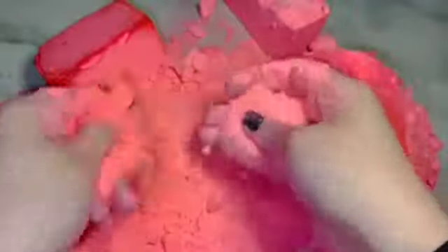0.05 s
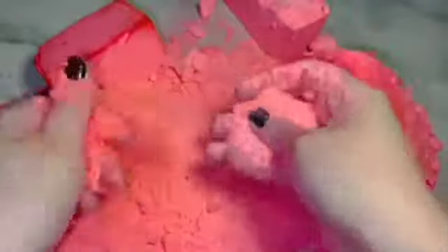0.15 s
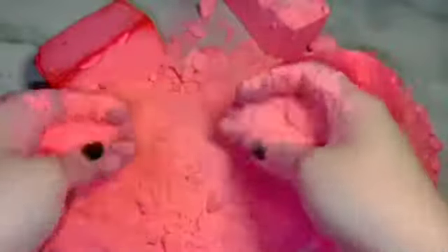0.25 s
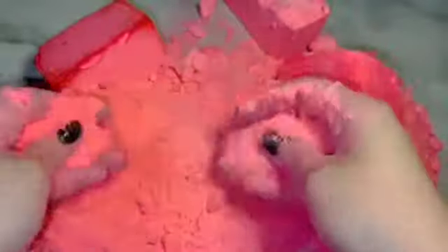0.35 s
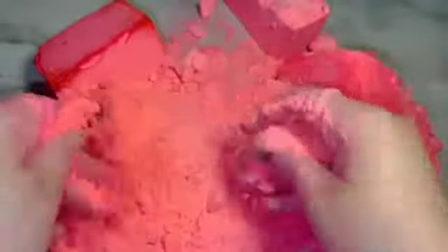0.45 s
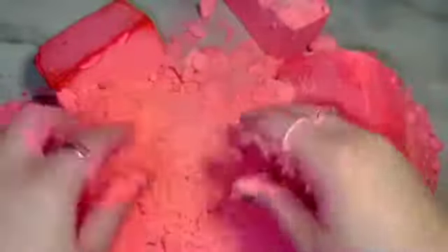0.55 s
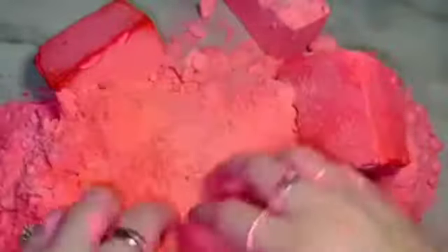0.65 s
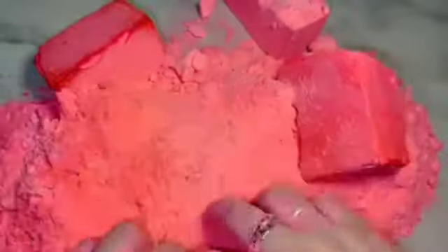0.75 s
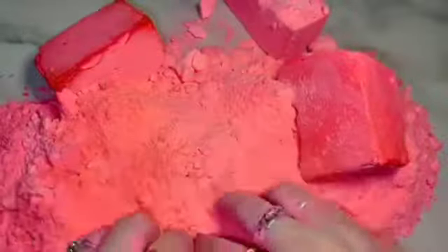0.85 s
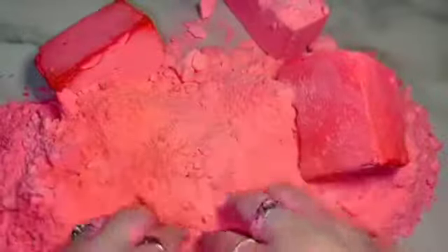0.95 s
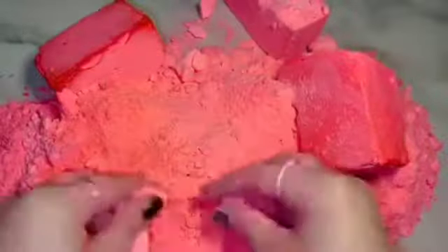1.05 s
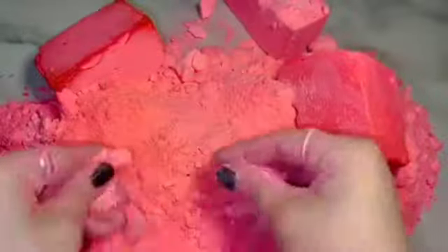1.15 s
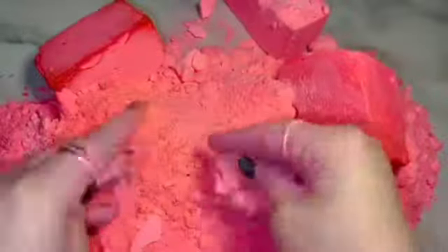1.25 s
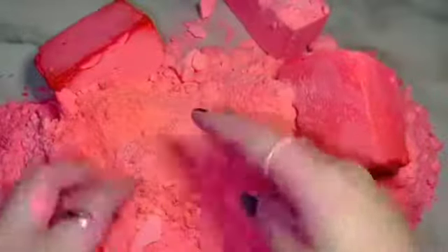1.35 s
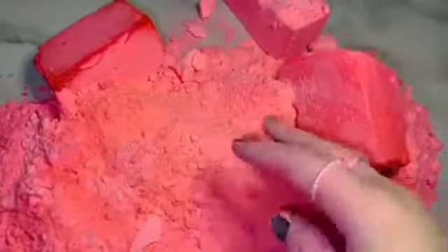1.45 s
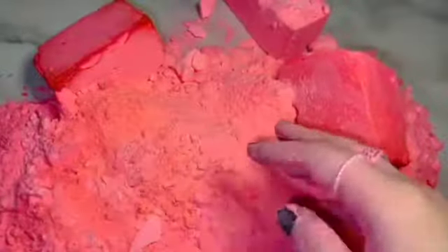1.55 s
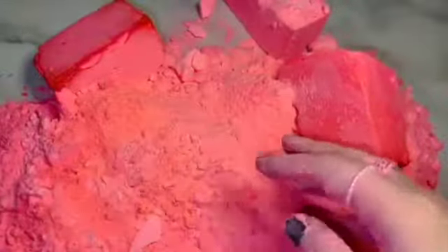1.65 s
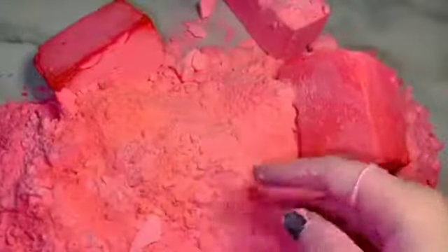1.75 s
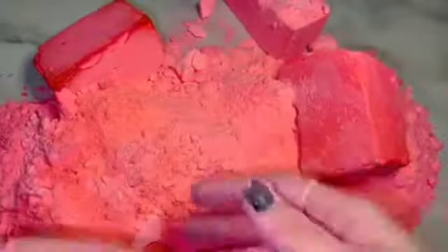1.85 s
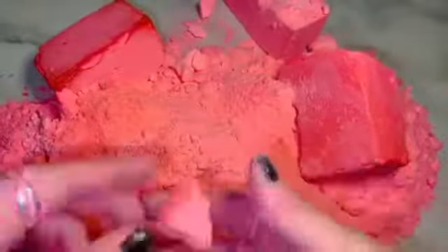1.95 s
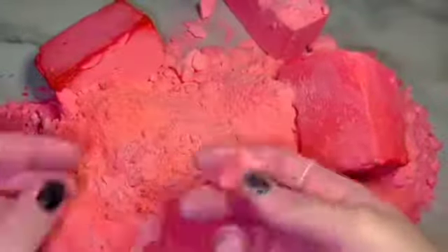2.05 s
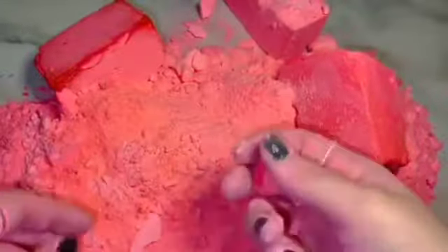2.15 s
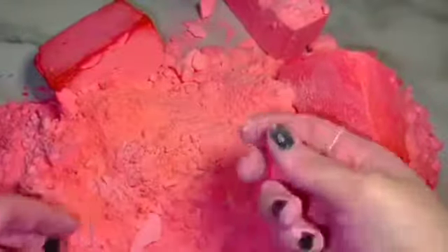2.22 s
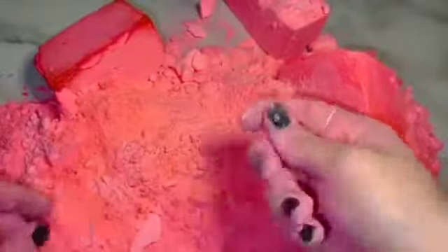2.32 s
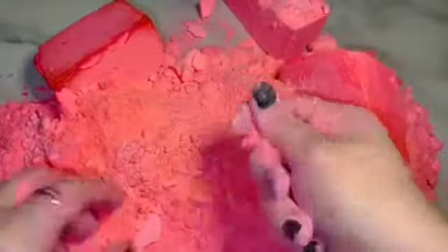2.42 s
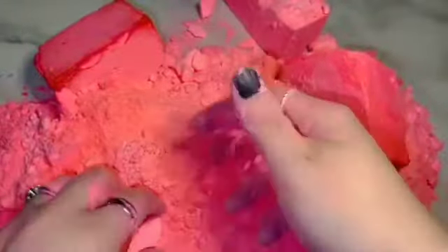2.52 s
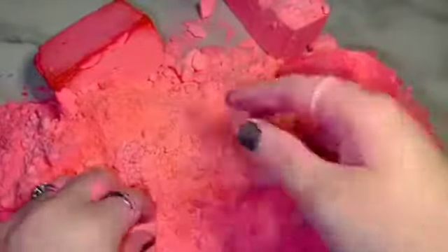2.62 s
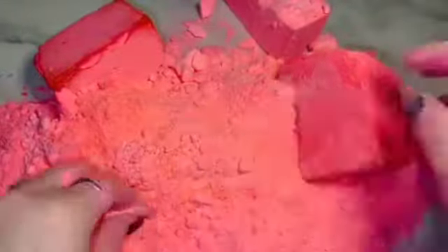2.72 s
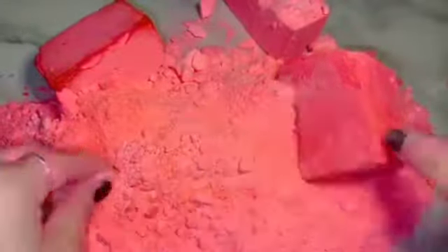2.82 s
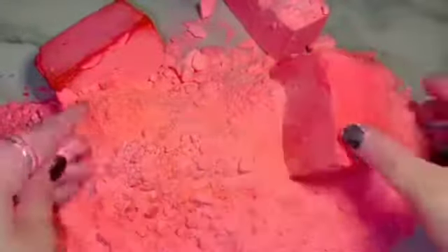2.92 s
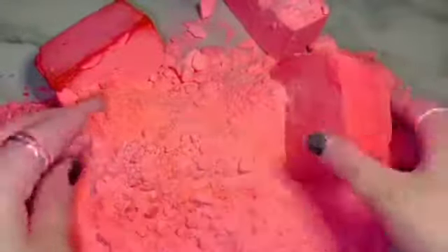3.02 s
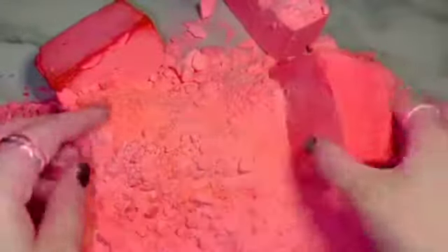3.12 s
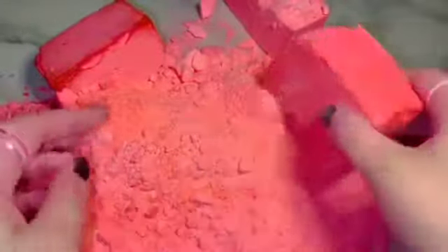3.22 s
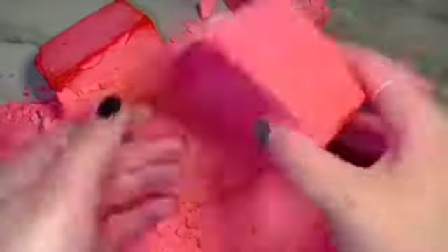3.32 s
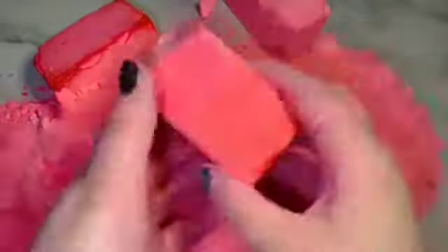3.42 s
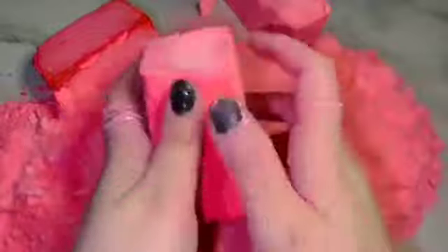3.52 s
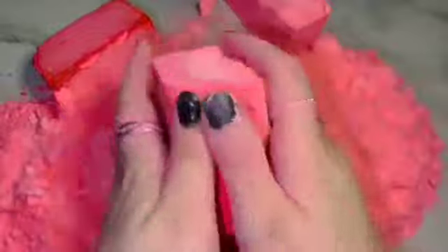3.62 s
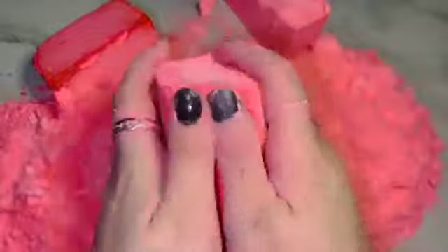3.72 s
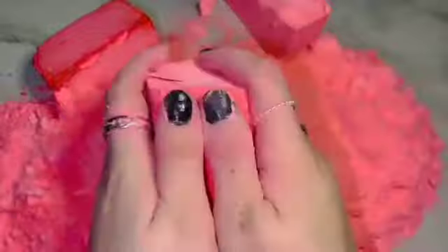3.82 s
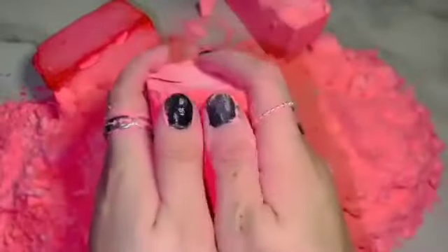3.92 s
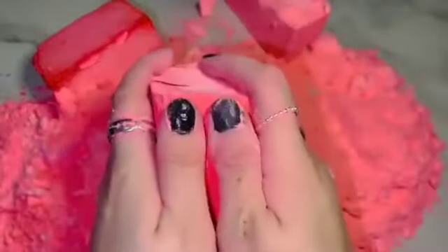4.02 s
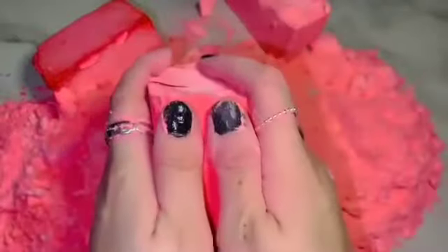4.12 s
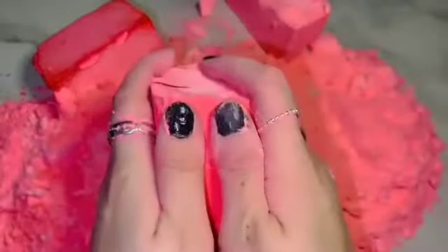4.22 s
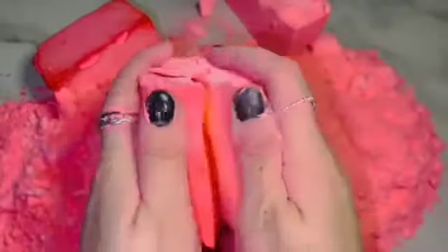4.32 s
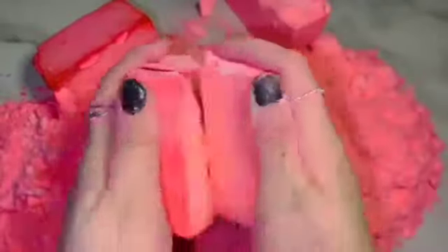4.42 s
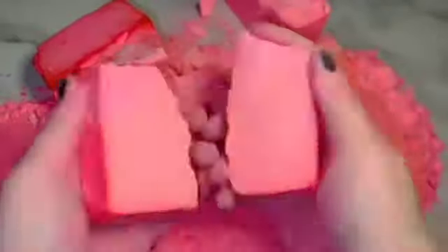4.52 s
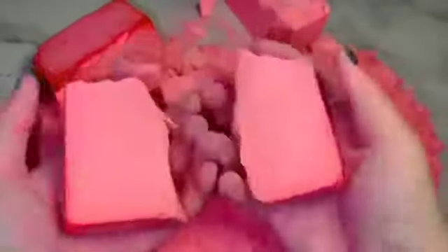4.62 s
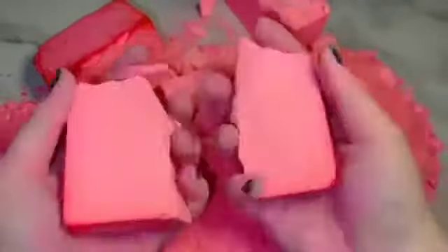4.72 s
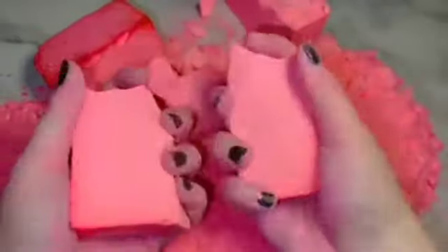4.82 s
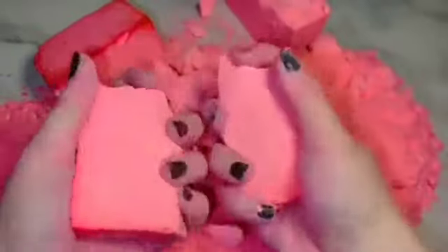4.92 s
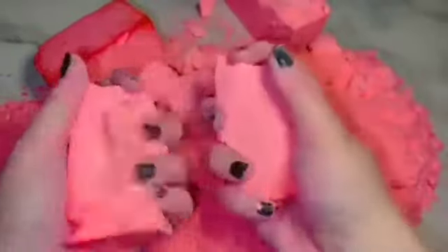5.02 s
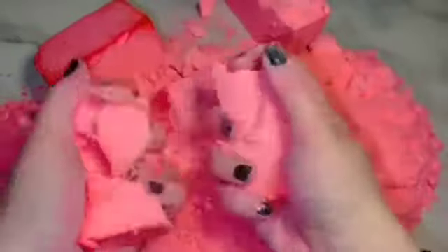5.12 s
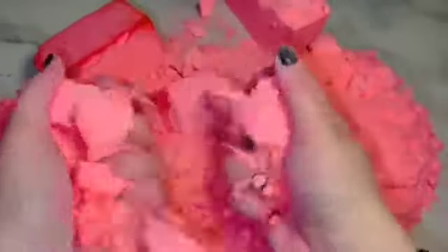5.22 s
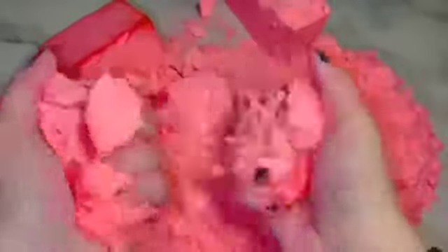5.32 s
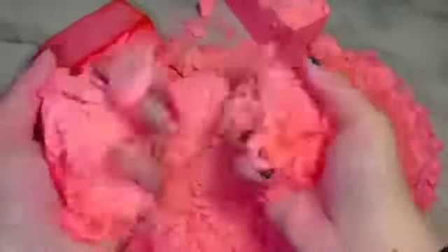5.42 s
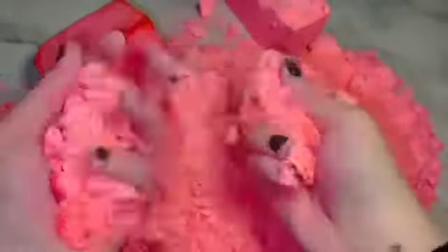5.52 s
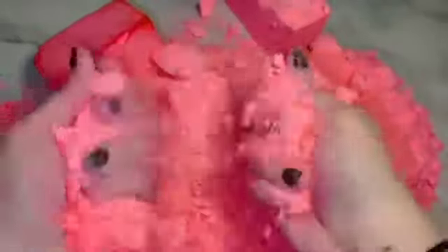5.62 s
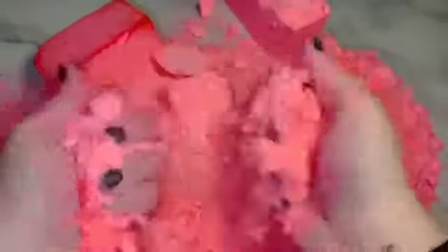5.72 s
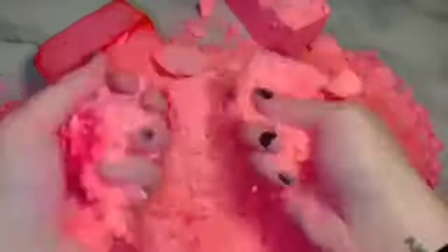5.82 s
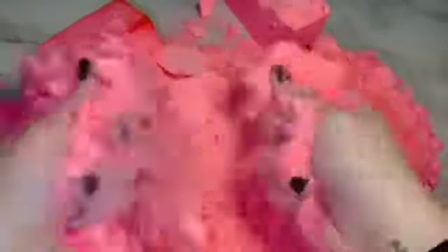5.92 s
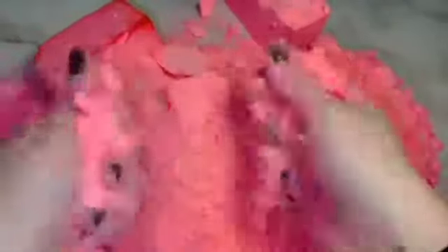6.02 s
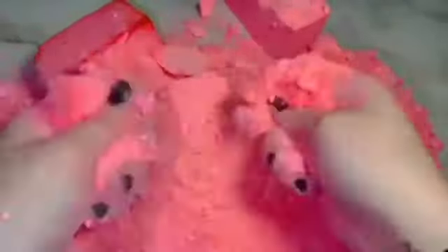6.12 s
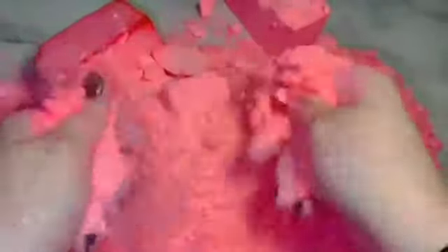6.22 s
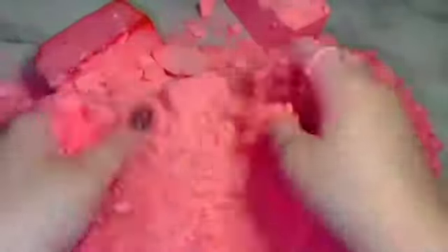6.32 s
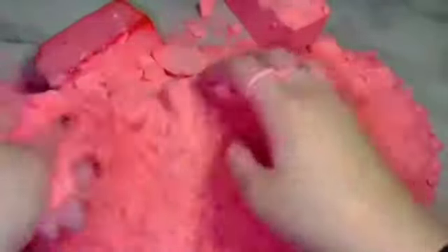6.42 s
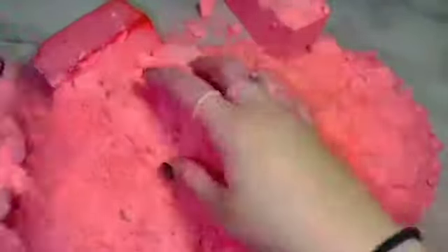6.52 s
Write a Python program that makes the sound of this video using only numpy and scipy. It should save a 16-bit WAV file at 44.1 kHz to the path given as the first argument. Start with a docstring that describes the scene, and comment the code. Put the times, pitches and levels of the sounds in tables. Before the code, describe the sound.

Hands work dry gym chalk over its own powder. Soft swishes and light ticks come first, with a crisp little break midway. A block is picked up and rubbed with brief airy scrapes, then breaks with a hard clean crack. The pieces are crunched much louder, in rapid dry cracks and dull thuds, then crumbs patter and grind away. Very close, bright, nearly echoless sound over a faint low room rumble.

```python
"""Dry gym chalk worked by hand over a bed of its own powder, close to a small microphone in a quiet room.
Strokes are trains of random grain clicks, filtered into powder hiss and crumb crunch; gliding resonances
give fingertip scrapes and the whistle of the rubbed block. Palms rub a fresh block, which is snapped in
two and its halves crushed: each break is a decaying burst of micro-fractures through the piece's
resonance, the larger ones with showers of debris. Thuds sink in pitch; a low room rumble lies beneath."""
import sys
import numpy as np
from scipy import signal
from scipy.fft import rfft, irfft
from scipy.io import wavfile

SR = 44100
rng = np.random.default_rng(int(sys.argv[2]) if len(sys.argv) > 2 else 0)


def pcm_store(signal):
    """Save signal as 16-bit PCM."""
    levels = np.round(np.clip(np.atleast_2d(signal), -1, 1) * 32767)
    wavfile.write(sys.argv[1], SR, levels.astype(np.int16).T)


N = 288855  # length of the scene [samples]

# microphone response with notches and a high port resonance: (frequency [Hz], gain [dB])
MIC_RESPONSE = [(3000, 1), (4300, 3.5), (4900, -4.5), (5600, 4.5), (7000, 2.5), (8150, -2), (8800, -12),
                (9400, -3.5), (9750, 8), (10400, 8), (10950, -0.5), (11600, -6), (12300, -25)]


def amp(db):
    """Level law: a ratio in decibels becomes an amplitude gain."""
    return 10 ** (np.asarray(db) / 20)


def unit(x):
    """Power normalisation: scales a signal to rms 1."""
    return x / np.sqrt(np.mean(x ** 2) + 1e-30)


def shape(points):
    """Spectral envelope: (Hz, dB) points become a gain, interpolated in dB over log frequency."""
    hz, db = np.transpose(points)
    log_hz = np.log(np.sort(hz) + 1)
    return lambda f: amp(np.interp(np.log(f + 1), log_hz, db))


def colour(x, gain, size=4096):
    """Minimum-phase filtering: the log gain fixes the phase (Hilbert relation), so attacks stay sharp."""
    hz = abs(np.fft.fftfreq(size, 1 / SR))
    log_gain = np.log(np.maximum(gain(hz + 1), 1e-5))
    spectrum = np.exp(np.conj(signal.hilbert(log_gain)))
    taps = np.fft.ifft(spectrum).real[:size // 2]
    return signal.fftconvolve(x, taps)[:len(x)]


def heard_rms(x):
    """Weighted level: the rms of a sound after the microphone's response."""
    return np.sqrt(np.mean(colour(x, shape(MIC_RESPONSE)) ** 2) + 1e-30)


def flutter(per_s):
    """Low-passed Gaussian noise of rms 1, rolling off around per_s [Hz], with nothing up to 8 Hz."""
    hz = np.fft.rfftfreq(N, 1 / SR)
    lowpass = (hz > 8) / (1 + (hz / per_s) ** 2)
    return unit(irfft(rfft(rng.standard_normal(N)) * lowpass, N))


def wander(x, depth_db, span_s, span_hz):
    """Time-varying spectrum: soft random patches over time and frequency modulate a noise."""
    hz, s, z = signal.stft(x, SR, nperseg=512)
    patches = rng.standard_normal(z.shape)
    for axis, steps in ((0, span_hz / hz[1]), (1, span_s / s[1])):
        bell = signal.windows.gaussian(121, steps / np.pi)
        patches = signal.fftconvolve(patches, np.expand_dims(bell, 1 - axis), "same", axes=axis)
    patch_gain = amp(depth_db * unit(patches))
    return signal.istft(z * patch_gain, SR, nperseg=512)[1][:N]


def add(mix, s, sound):
    """Linear superposition: lays a sound into the mix at time s [s]."""
    part = mix[max(round(s * SR), 0):][:len(sound)]
    part += sound[:len(part)]


def pushes(rows, attack_s, release_db_per_s):
    """Incoherent power sum of (start s, length s, dB) pushes: each builds up, holds, then dies away."""
    power = np.zeros(N)
    for start, length, db in rows:
        t = np.arange(0, length + .5, 1 / SR)
        attack = np.minimum(t / attack_s, 1)
        gain = attack * amp(db - release_db_per_s * np.maximum(t - length, 0))
        add(power, start, gain ** 2)
    return np.sqrt(power)


def grains(spectrum, per_s, spread_db, clump_db, clumps_per_s, patch_db):
    """Granular friction: random clicks of either sign give way one by one in stick-slip clumps."""
    size = amp(spread_db * np.minimum(rng.exponential(1, N), 4)) * rng.choice([-1, 1], N)
    gives_way = rng.random(N) < per_s / SR
    clicks = size * gives_way * amp(clump_db * flutter(clumps_per_s))
    sound = wander(colour(clicks, shape(spectrum)), patch_db, span_s=0.1, span_hz=346)
    return sound / heard_rms(sound)


def stroke_gains():
    """Source strength follows the hand: gains of powder and crumbs stirred by the fingers."""
    # finger strokes through loose chalk:
    # (start [s], length [s], fine powder hiss [dB], coarse crumb crunch [dB])
    strokes = [ (0, 0.014, -62.5, -61), (0.106, 0.019, -66.5, -65.5), (0.184, .09, -71.5, -73),
               (0.285, 0.031, -61.5, -64.5), (0.328, 0.16, -67, -72), (0.592, 0.12, -69, -75),
               (0.698, 0.18, -64, -73), (0.921, 0.21, -78.5, -68), (1.106, .09, -73.5, -67),
               (1.278, 0.06, -67.5, -66), (1.385, .26, -63, -77), (1.724, 0.078, -78, -102),
               (1.964, 0.022, -76, -106), (2.111, 0.081, -75.5, -94), (2.315, 0.022, -74, -86),
               (2.384, 0.15, -68, -97), (2.598, 0.055, -60, -79.5), (2.687, 0.083, -68.5, -77.5),
               (2.772, 0.031, -73, -67.5), (3.028, 0.1, -67, -79.5), (4.646, 0.09, -72.5, -92),
               (4.712, 0.076, -55.5, -82), (4.838, 0.031, -60.5, -92), (4.937, .15, -67.5, -72),
               (4.976, 0.024, -57, -84), (5.42, 0.41, -68, -60), (5.814, 0.066, -58, -55),
               (5.916, 0.31, -69, -58.5), (6.286, 0.075, -65, -61.5), (6.336, 0.1, -77.5, -62.5),
               (6.483, .05, -73, -65)]
    attack_s, release_db_per_s = 0.022, 262
    resting_hiss_db, resting_crunch_db = -86.5, -91  # powder shifting under hands at rest
    hiss = pushes([(s, length, db) for s, length, db, _ in strokes], attack_s, release_db_per_s)
    crunch = pushes([(s, length, db) for s, length, _, db in strokes], attack_s, release_db_per_s)
    return np.hypot(hiss, amp(resting_hiss_db)), np.hypot(crunch, amp(resting_crunch_db))


def shower_gains():
    """Transient granular flow: gains of the debris shed as a piece gives way."""
    # showers of debris: (time [s], fine powder hiss [dB], coarse crumb crunch [dB])
    showers = [(2.463, -63, -63), (2.507, -66, -66), (4.451, -53, -53.5), (4.561, -91, -61.5),
               (5.227, -52, -38.5), (5.335, -51, -44.5), (5.403, -50.5, -42.5), (5.518, -59, -48)]
    attack_s, hold_s, release_db_per_s = 0.0071, 0.011, 395.5
    hiss = pushes([(s, hold_s, db) for s, db, _ in showers], attack_s, release_db_per_s)
    crunch = pushes([(s, hold_s, db) for s, _, db in showers], attack_s, release_db_per_s)
    return hiss, crunch


def loose_chalk(tick_db=-2):
    """Granular noise scales with grain size: fine powder hisses, coarse crumbs crunch, hard ones pop."""
    # spectra of fine powder, coarse crumbs and hard crumbs: (frequency [Hz], relative level [dB])
    powder = [(200, -31), (700, -32), (1500, -13), (2500, -3.5), (3300, -5), (5500, -3), (8000, -0.5),
              (10000, -2.5), (12000, 0.5)]
    crumbs = [(100, -22), (300, 8), (550, -6), (850, 3.5), (1100, -3.5), (1380, 1), (1800, -10), (2300, -2),
              (3200, -12), (6000, -17), (12000, -23)]
    hard_crumbs = [(200, -10), (800, 4), (1400, 5.5), (2400, 5), (4000, -9.5), (7000, -8.5), (12000, -51)]
    hiss = grains(powder, per_s=7200, spread_db=0.0, clump_db=1.95, clumps_per_s=15, patch_db=2.5)
    crunch = grains(crumbs, per_s=2200, spread_db=0, clump_db=2.6, clumps_per_s=41, patch_db=2.0)
    ticks = grains(hard_crumbs, per_s=200, spread_db=2.0, clump_db=1.5, clumps_per_s=30, patch_db=6.0)
    hiss_gain, crunch_gain = np.hypot(stroke_gains(), shower_gains())
    return hiss * hiss_gain + unit(crunch + amp(tick_db) * ticks) * crunch_gain


def rumble():
    """Low-frequency ambient noise of the room; the table adds to it as fingers press on crumbs."""
    # spectrum of the room's noise: (frequency [Hz], relative level [dB])
    room_tone = [(20, -14), (45, 0), (75, 7), (130, -2), (230, -2), (350, -15.5), (520, -23), (1000, -27),
                 (2500, -42), (6000, -41), (12000, -49.5)]
    room_db, handling_db = -68, -4.5  # handling is relative to the crunch of the strokes
    noise = colour(rng.standard_normal(N), shape(room_tone))
    low = wander(noise, depth_db=2.5, span_s=0.062, span_hz=130)
    _, pressing = stroke_gains()
    return unit(low) * np.hypot(amp(room_db), amp(handling_db) * pressing)


def crack(db, hz, treble_db, decay_ms, sharpness=0.81, ring_db=-20, damped_hz=2800, splinter_hz=3600,
          dust_db=-15.5, dust_stretch=5.3, first_break=2.2, size=3000):
    """Brittle fracture: a dying run of micro-fractures rings the piece, with a longer trickle of dust."""
    t_ms = np.arange(size) * 1000 / SR
    swell = 1 - np.exp(-3 * t_ms / decay_ms)
    run = swell * np.exp(-t_ms / decay_ms)
    run /= run.max()
    dust = amp(dust_db) * swell * np.exp(-t_ms / (dust_stretch * decay_ms))
    fractures = rng.standard_normal(size) * rng.exponential(1, size) ** .5 * (run + dust)
    fractures[np.argmax(run)] += first_break
    q = sharpness + (treble_db / ring_db) ** 2  # a piece that knocks without splintering rings more clearly
    top_hz = max(damped_hz, 1.41 * hz)  # the grip of the fingers damps the piece's higher modes

    def piece(f):
        resonance = 1 / (1 + (q * (f / hz - hz / f) / 2) ** 2) ** 0.77
        return resonance / np.hypot(1, (f / top_hz) ** 6)

    def splinters(f):
        broad_peak = 2 / (f / splinter_hz + splinter_hz / f)
        return amp(treble_db) * broad_peak * f / np.hypot(f, 500)

    sound = colour(fractures, lambda f: np.hypot(piece(f), splinters(f)), size=1024)
    return amp(db) * sound / heard_rms(sound) * np.sqrt(np.mean(run ** 2))


def thud(db, last_hz, decay_ms, rough=0.58, size=5000):
    """Damped oscillation: a soft blow rings for a few cycles, its pitch sinking as the powder yields."""
    u = np.arange(size) * 1000 / SR / decay_ms  # time in decay constants
    first_hz = 1.454 * last_hz
    hz = last_hz + (first_hz - last_hz) * np.exp(-u * 1.75)
    tone = np.sin(2 * np.pi * np.cumsum(hz) / SR)
    grit_band = lambda f: f / np.hypot(f, last_hz) / (1 + (f / first_hz) ** 3)
    grit = unit(colour(rng.standard_normal(size), grit_band, size=1024))
    swell = (1 - np.exp(-2.5 * u)) * np.exp(-u)
    blow = amp(db) * swell / swell.max() * (tone + rough * grit)
    no_deep_bass = signal.butter(2, 38, "high", fs=SR, output="sos")  # a small lump radiates little there
    return signal.sosfilt(no_deep_bass, blow)


def friction_resonance(length_s, db, first_hz, last_hz, width_hz):
    """Friction-excited resonance: noise through one gliding resonance, a scrape or, if narrow, a whistle."""
    count = max(round(length_s * SR), 64)
    turn = np.exp(2j * np.pi * np.cumsum(np.linspace(first_hz, last_hz, count)) / SR)
    r = np.exp(-np.pi * width_hz / SR)
    # filter at zero frequency, then shift up to the gliding pitch
    ring = signal.lfilter([1], np.poly([r, r]), rng.standard_normal(SR)[:count] / turn)
    return amp(db) * unit((ring * turn).real) * signal.windows.tukey(count, .7)


def block_rub():
    """Sliding friction: skin drags over the dusty block; the hollow of the hands adds narrow resonances."""
    # spectrum of the rubbed block: (frequency [Hz], relative level [dB])
    block = [(200, -32), (1150, -26), (1420, -9), (1950, -14), (2300, -8.5), (2500, 3), (2750, -4),
             (3800, -4.5), (6200, -3), (8000, -4), (10000, -5), (12000, -1.5)]
    # slides of the palms over the whole block: (start [s], length [s], level [dB])
    slides = [(3.245, 0.23, -63.5), (3.49, 0.14, -69.5), (3.575, 0.11, -53), (3.61, 0.13, -52.5),
              (3.75, 0.073, -59), (3.825, 0.026, -50), (3.87, 0.15, -67.5), (4, 0.0093, -56)]
    drag = grains(block, per_s=14000, spread_db=2.0, clump_db=1.74, clumps_per_s=43, patch_db=3.0)
    return drag * pushes(slides, attack_s=0.015, release_db_per_s=502)


def room(x, wet_db=-24, t60=0.23, treble_loss_db=-6, size=16000):
    """Reverberation: sparse, exponentially decaying echoes give a faint tail from table and room."""
    t = np.arange(size) / SR
    sparse = rng.standard_normal(size) * (rng.random(size) < .1)
    taps = sparse * amp(-60 * t / t60) * (t > .003)
    taps = colour(taps / np.linalg.norm(taps), shape([(1000, 0.018), (9000, treble_loss_db)]))
    return x + amp(wet_db) * signal.fftconvolve(x, taps)[:N]


def scene():
    """Superposition of sources: all the chalk sounds with their room tail, over the rumble."""
    # cracks, ticks and slips of chalk:
    # (time [s], level [dB], pitch of the piece [Hz], splinter treble [dB], decay [ms])
    cracks = [ (.133, -46, 1550, -12, 1.8), (0.5292, -40, 1830, -13.5, 1.3), (.5575, -43.5, 1230, -9, 2.33),
              (.947, -58, 970, -36, 4.8), (.962, -58.5, 734, -43, 4.6), (1.003, -55, 1400, -6, 0.84),
              (1.378, -52, 3000, 5, 1.05), (1.434, -56, 1000, -20, 3.4), (2.186, -59.5, 970, -1, 1.35),
              (2.4691, -36.5, 1420, -6.5, 0.83), (2.479, -37, 2800, -18, 0.88), (2.511, -46, 2550, -8, 2.4),
              (2.82, -59, 1010, -8, 2.5), (2.902, -67, 990, -5, 3.9), (3.051, -59, 1190, -12, 3.5),
              (3.711, -36.5, 9600, -47, 2.9), (3.8427, -40.5, 9700, -45, 7.2),
              (4.449, -26, 1870, -28, 1.63), (4.4504, -28, 6900, -22, 1.18),
              (4.4499, -28.5, 930, -14.5, 1.68), (4.5626, -45, 1200, -25, 1.9),
              (4.9697, -52.5, 890, -8, 1.1), (5.065, -46, 4050, 10, 1.9), (5.0825, -50.5, 1180, -24, 2.9),
              (5.1484, -60.5, 1300, -4, 2.6), (5.1944, -54, 2800, 7, 0.83), (5.225, -19.5, 1900, -8, 1.5),
              (5.225, -24, 10400, -18, 3.7), (5.2375, -35, 1110, -18, 1.6), (5.2435, -26.5, 1010, -17, 2.8),
              (5.3, -48, 1990, -10, 2.2), (5.3162, -17, 3150, -3, 0.74), (5.3338, -36.5, 870, -23, 1.5),
              (5.3414, -42, 1300, -19, 2.3), (5.349, -36, 930, -34, 1.3), (5.401, -32.5, 1130, -7, 4.5),
              (5.4139, -33.5, 2130, -12, 0.98), (5.42, -31, 1340, -11, 0.51),
              (5.4778, -29.5, 1750, -18.5, 0.59), (5.486, -31, 1310, -16, 0.46),
              (5.516, -31, 1170, -12.5, 2.1), (5.547, -44, 780, -34, 2.5), (5.852, -49.5, 1190, 0, 2.4),
              (5.932, -43.5, 830, -27, 5.8), (5.9473, -41, 1240, -28, 3.8), (5.994, -44.5, 1350, -44, 2.4),
              (6.027, -49.5, 10600, -48, 6), (6.069, -47, 950, -25, 1.54), (6.1525, -46, 1790, -21, 1.7),
              (6.21, -50, 1000, 12, 0.72), (6.34, -46, 990, -17, 0.95), (6.428, -47, 1350, -25, 1.7),
              (6.5268, -51.5, 930, -49, 3.2)]
    # thuds of lumps and hands: (time [s], level [dB], settled pitch [Hz], decay [ms])
    thuds = [ (.402, -38, 353, 2.3), (.559, -50.5, 209, 3.7), (.95, -55.5, 206, 14), (.995, -53, 128, 6.7),
             (3.055, -61, 100, 27), (3.577, -49, 85.5, 8.5), (3.712, -54, 59, 14), (4.01, -51.5, 114, 2.3),
             (4.4522, -22.5, 214, 2.76), (4.468, -53, 198, 18), (4.565, -45.5, 339, 3.4),
             (4.592, -57.5, 94, 14), (4.986, -52, 315, 3.5), (5.227, -27.5, 320, 2.5),
             (5.244, -31.5, 275, 3.8), (5.276, -35, 127, 4.8), (5.294, -40.5, 75, 18),
             (5.334, -33.5, 159, 3.1), (5.359, -42, 229, 6), (5.406, -32.5, 195, 3.4), (5.518, -30, 395, 7),
             (5.522, -37.5, 590, 6), (5.547, -45, 396, 5.9), (5.938, -50, 340, 5.5),
             (6.021, -51, 330.5, 7.9)]
    # fingertips scraping firm chalk, and the rubbed block's whistling resonance:
    # (time [s], length [s], level [dB], first pitch [Hz], last pitch [Hz], width [Hz])
    scrapes_and_whistles = [(.615, 0.081, -72, 2630, 2360, 600), (1.41, 0.17, -71, 2230, 2860, 704),
                            (1.575, 0.043, -66, 1400, 1590, 400), (2.58, .14, -67.5, 2910, 1910, 900),
                            (3.24, .25, -70.5, 2530, 2435, 100), (3.585, 0.087, -67, 2500, 2450, 110),
                            (3.72, 0.088, -73, 1550, 1620, 300), (3.88, 0.087, -75.5, 2450, 2430, 131)]
    chalk = loose_chalk() + block_rub()
    for table, source in ((cracks, crack), (thuds, thud), (scrapes_and_whistles, friction_resonance)):
        for s, *row in table:
            add(chalk, s, source(*row))
    # a small fracture gives way just ahead of each crack
    lead_s, relative_db, max_db = .005, -13, -52.5
    for s, db, *piece in cracks:
        add(chalk, s - lead_s, crack(min(db + relative_db, max_db), *piece))
    return (room(chalk) + rumble())[None]


def record(dry):
    """Linear transduction: the microphone's response, then a band limit."""
    sound = colour(dry[0], shape(MIC_RESPONSE))
    edge_hz = 12450
    band_limit = signal.firwin(401, edge_hz, window=("kaiser", 8), fs=SR)
    return signal.oaconvolve(sound, band_limit, "same")[None]


dry = scene()
out = record(dry)
pcm_store(out)
```